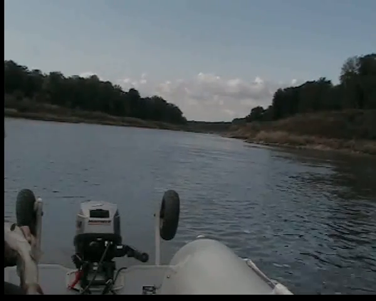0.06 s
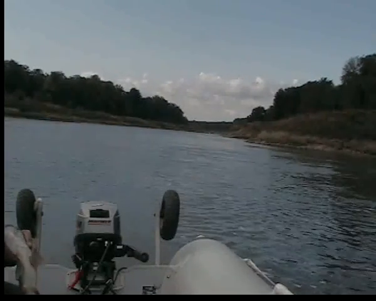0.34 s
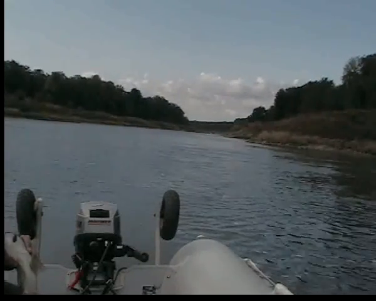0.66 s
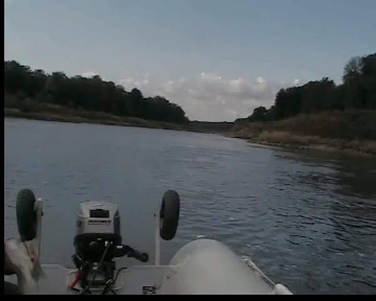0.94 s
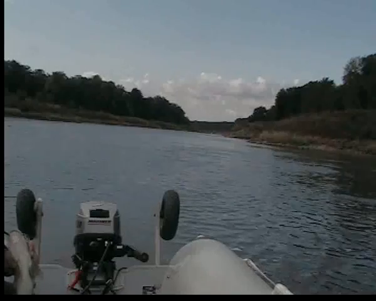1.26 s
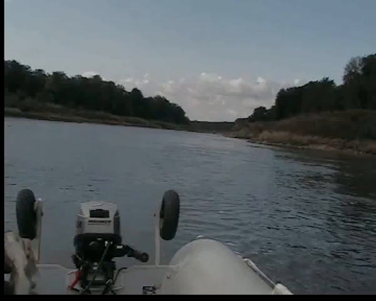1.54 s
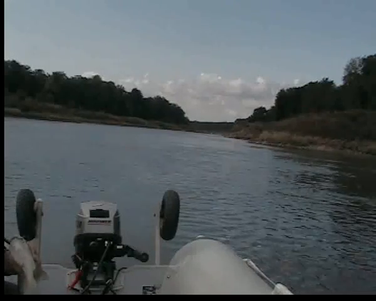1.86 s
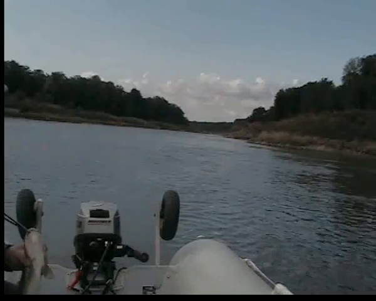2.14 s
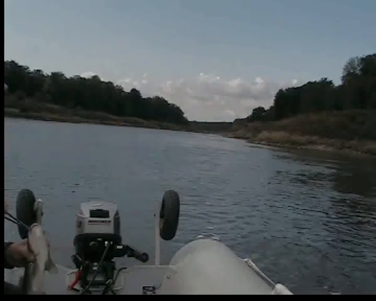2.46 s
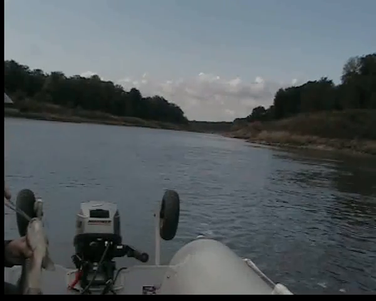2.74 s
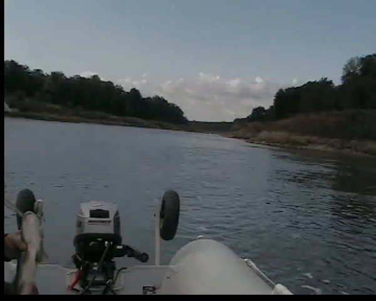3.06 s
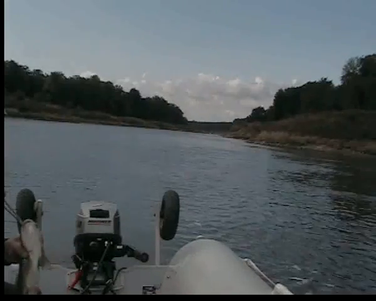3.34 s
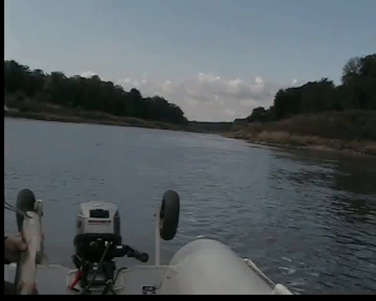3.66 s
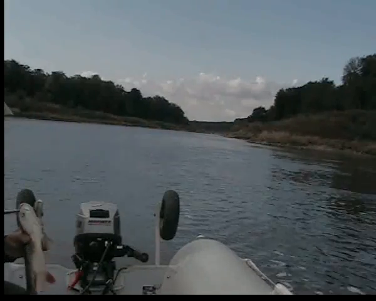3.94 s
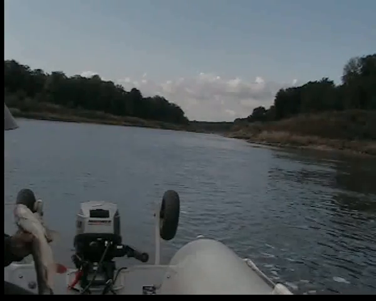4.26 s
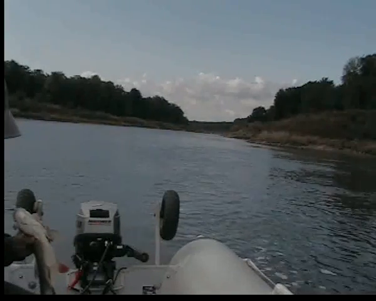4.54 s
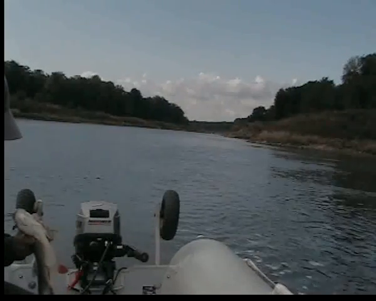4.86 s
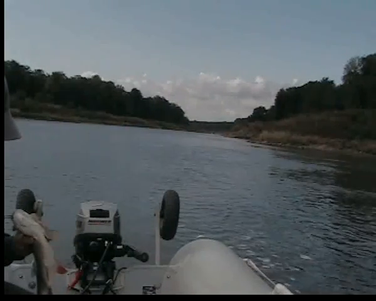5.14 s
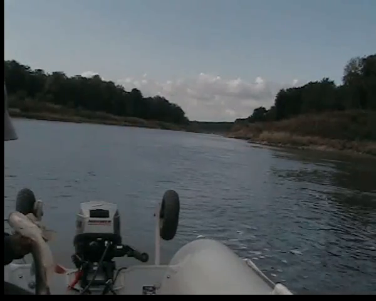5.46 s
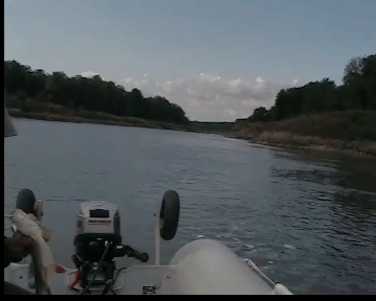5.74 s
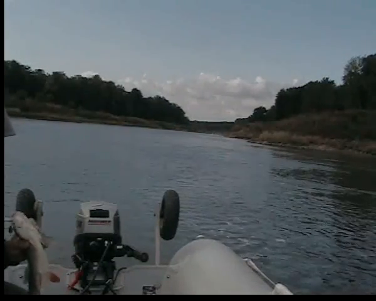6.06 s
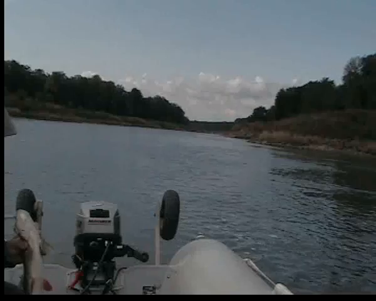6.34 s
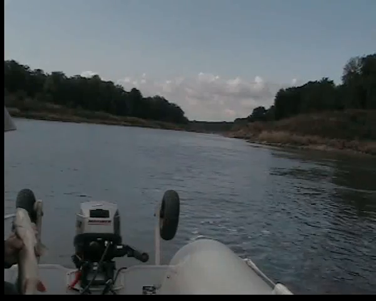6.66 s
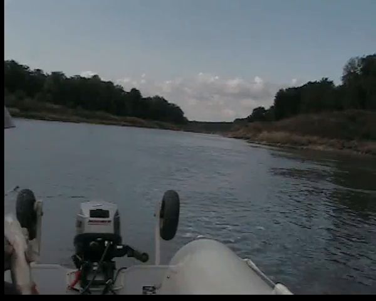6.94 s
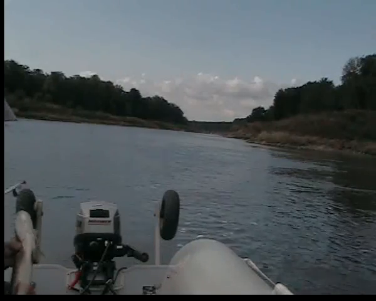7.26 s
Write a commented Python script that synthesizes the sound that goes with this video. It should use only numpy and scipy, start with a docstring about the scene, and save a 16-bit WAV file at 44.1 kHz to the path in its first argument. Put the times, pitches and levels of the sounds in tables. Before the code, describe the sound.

A metal lure and hooks jingle and clack in an inflatable boat, over low bumps, gentle wind rumble and hiss.

```python
"""Unhooking a fish in an inflatable boat

The boat drifts on a calm river while an angler works a metal lure free of a fish. Blade, rings and
hooks clink and jingle, hard tackle clacks, and the hull takes soft bumps and laps of water.
A light breeze rumbles on the microphone of a small camera that hisses and whines faintly.
A low hum wavers underneath, and a far bird chirps once."""
import sys
import numpy as np
from scipy.fft import rfft, irfft, next_fast_len
from scipy.io import wavfile
from scipy.ndimage import uniform_filter1d, map_coordinates

SR = 44100
rng = np.random.default_rng(int(sys.argv[2]) if len(sys.argv) > 2 else 0)


def wav_out(sig):
    """Save sig, one row per channel (or a flat mono array), as 16-bit PCM at SR to the path in sys.argv[1]."""
    wavfile.write(sys.argv[1], SR, np.round(np.clip(np.atleast_2d(sig).T, -1, 1) * 32767).astype(np.int16))


N = 321930
TIME = np.arange(N) / SR

# Table levels are relative: the layers apply their own trims.
# Gusts on the microphone. Each row: start in seconds, length in seconds, level in dB.
WIND_GUSTS = [(1.12, 0.39, -47), (2.33, 0.15, -46), (3.46, 0.12, -43.5), (3.83, 0.37, -46),
              (4.37, 0.34, -42), (4.88, 0.41, -47), (6.02, 0.55, -46), (6.88, 0.46, -43),
              (7.23, 0.13, -25.5)]
# The wind's rumble. Each row: frequency in Hz, noise density in dB.
WIND_SPECTRUM = [(8, -5.5), (22, 6), (45, -5), (70, -7), (120, -19), (250, -42.5), (600, -55), (2000, -120)]
# The drift of the low hum. Each row: time in seconds, pitch in Hz, level in dB.
HUM_PATH = [(0, 184.4, -67.5), (1.699, 185.8, -64.5), (2.2, 200.3, -70), (7.3, 203.4, -68.5)]
# The camera's hiss. Each row: frequency in Hz, noise density in dB.
HISS_SPECTRUM = [(30, -7.5), (100, -1.5), (140, -4), (200, -9), (270, -9.5), (450, -13), (900, -17),
                 (2000, -19.5), (3500, -19), (6200, -27.5), (10000, -29), (14500, -29), (15700, -33),
                 (16200, -56)]
# The camera's electrical hum and whine. Each row: frequency in Hz, level in dB.
CAMERA_TONES = [(100, -64.5), (14174, -80), (14223, -78), (15624, -76)]
# Water lapping at the hull. Each row: start in seconds, level in dB, starting pitch in Hz.
WATER_LAPS = [(0.097, -52, 406), (1.958, -49.5, 576), (2.683, -58, 312), (3.644, -52, 447),
              (3.962, -53.5, 638), (5.14, -50.5, 437), (6.329, -48, 521)]
# The wash around each lap. Each row: frequency in Hz, noise density in dB.
WASH_SPECTRUM = [(100, -25), (350, -7.5), (650, -8), (1200, -18.5), (4000, -30), (12000, -120)]
# Tackle knocking together. Each row: start in seconds, level in dB, favoured Hz, spread in octaves.
TACKLE_KNOCKS = [(0.151, -48, 2600, 0.12), (0.467, -48, 1500, 1.2), (0.821, -43, 1400, 0.21),
                 (1.163, -47.5, 1380, 0.9), (1.567, -45.5, 2040, 0.8), (1.747, -46, 1610, 0.58),
                 (1.892, -43.5, 1290, 1.1), (1.911, -43.5, 1050, 0.65), (1.939, -37.5, 1270, 0.09),
                 (3.256, -43.5, 2480, 1.3), (3.3997, -31, 1690, 1.1), (3.427, -29, 2600, 0.22),
                 (3.481, -40, 3330, 0.7), (3.951, -43, 2270, 1.1), (3.971, -46, 1840, 0.13),
                 (4.031, -48, 3000, 0.6), (4.058, -47, 3300, 0.5), (4.162, -47.5, 3380, 0.63),
                 (4.904, -50, 1750, 0.25), (6.098, -46.5, 6200, 0.2), (6.235, -38.5, 6200, 0.11),
                 (6.8645, -28, 1730, 0.21), (6.876, -36.5, 1270, 0.14)]
# The tackle's resonances. Each row: frequency in Hz, bandwidth in Hz, level in dB.
TACKLE_MODES = [(960, 290, 6), (1270, 116, 7), (1510, 240, 3.5), (1740, 560, 3.5), (2140, 240, 5.5),
                (2400, 134, 8.5), (3400, 190, 4.5), (3680, 130, 4.5), (6200, 760, -13)]
# Bouts of shaking the lure. Each row: start in seconds, length in seconds, level in dB.
LURE_SHAKES = [(0.2, 0.85, -62), (1.17, 0.14, -50), (1.57, 0.5, -52), (3.1, 0.41, -55), (3.96, 0.14, -45),
               (4.27, 0.32, -64), (6.89, 0.36, -48.5)]
# The blade's ring. Each row: frequency in Hz, level in dB.
BLADE_MODES = [(13550, -11), (13700, -2.5), (13900, -22)]
# The ring of hooks and split rings. Each row: frequency in Hz, level in dB.
HOOK_MODES = [(5800, -25), (5950, -24), (6150, -29), (6330, -26), (12460, -12), (12600, -18), (12920, -10),
              (13060, -1.5), (13150, -22), (13297, -19), (13390, -14)]
# The click of metal on metal. Each row: frequency in Hz, noise density in dB.
CLICK_SPECTRUM = [(1000, -23), (3500, -12.5), (5200, -13.5), (6000, -11), (8000, -2), (11000, 2),
                  (14500, 3.5), (15500, -4), (17000, -43)]
# Strikes on the lure. Each row: start in seconds, then blade, hook and click levels in dB.
LURE_STRIKES = [(0.5483, -51, -53, -61), (0.776, -46, -46, -62), (1.23, -46, -35.5, -60),
                (1.255, -50, -44, -45.5), (1.5804, -43, -42, -50), (1.6, -35, -38, -51),
                (1.74, -42, -43, -60), (1.772, -45, -39, -65), (1.8914, -36, -43, -36.5),
                (1.9384, -42, -45, -43), (1.988, -52, -37, -62), (2.0116, -35, -28, -61),
                (2.132, -37, -45, -51), (2.2782, -56, -46, -57), (2.453, -57, -53, -57),
                (3.138, -54, -40, -65), (3.2597, -48, -36, -53), (3.3995, -24, -50, -26.5),
                (3.4263, -39, -44, -29), (3.436, -23, -29, -26), (3.4475, -12, -16, -32),
                (3.4686, -9, -16, -29), (3.482, -14, -17, -28), (3.5705, -45, -24, -35),
                (3.578, -39, -35, -41), (3.7864, -47, -30.5, -49), (3.833, -56, -41, -48),
                (3.849, -38, -35, -49), (3.9492, -48, -48, -38), (4.0173, -48, -31, -37),
                (4.028, -46, -28, -40), (4.059, -45, -26, -40), (4.0684, -34, -25.5, -56),
                (4.137, -36, -33, -60), (4.1628, -34, -20, -36.5), (4.166, -24, -36, -43),
                (4.233, -41, -52, -68), (6.2668, -41, -40, -64), (6.2937, -41, -46, -59),
                (6.8306, -48, -46, -61), (6.866, -40, -35, -39), (6.881, -31, -20, -42),
                (6.887, -28, -25, -27.5), (6.901, -20, -25, -33), (6.9186, -10, -24, -42),
                (6.983, -41, -34, -49), (7.023, -23, -28, -45.5), (7.075, -42, -41, -56),
                (7.166, -37, -36.5, -67)]
# Light taps of line and hook. Each row: start in seconds, level in dB.
LINE_TAPS = [(1.0854, -47), (1.4036, -43), (1.6761, -43), (2.0976, -42), (2.6391, -45), (3.0615, -34),
             (3.088, -32), (3.9834, -46), (4.101, -38), (4.1264, -38), (5.5138, -47), (5.9135, -40),
             (6.097, -47), (6.2351, -27), (6.955, -44)]
# Soft bumps on the hull. Each row: start in seconds, level in dB, pitch in Hz.
HULL_BUMPS = [(1.966, -31, 139), (1.99, -35.5, 94), (4.526, -30, 40), (4.624, -31, 26.8),
              (5.247, -28.5, 51.6), (6.305, -27, 62), (6.342, -29, 31.3), (6.514, -37.5, 43.8),
              (6.883, -32, 97), (7.193, -25.5, 27), (7.25, -14.5, 51)]

# A light touch rings freely; a hard one presses the parts together and rings shorter.
RING_T60_S, LIGHT_DB, HALVING_DB = 0.09, -43, 41
GLANCE_RISE_S, STRIKE_RISE_S = 0.002, 0.00042


def amp(db):
    """Decibels to gain."""
    return 10 ** (np.asarray(db) / 20)


def unit(x):
    """Scale to rms 1."""
    return x / np.sqrt(np.mean(x ** 2) + 1e-20)


def wobble(rate):
    """A smooth random curve, rate knots a second."""
    return map_coordinates(rng.standard_normal(int(N * rate / SR) + 4), [TIME * rate])


def filtered(x, response):
    """Shape x with a frequency response."""
    size = next_fast_len(len(x) + 8192)
    return irfft(rfft(x, size) * response(np.fft.rfftfreq(size, 1 / SR)), size)[:len(x)]


def curve_db(spectrum, f):
    """Read an EQ curve of (Hz, dB) points on a log frequency axis."""
    hz, db = np.transpose(spectrum)
    return np.interp(np.log(f + 1), np.log(hz), db)


def noise(spectrum):
    """Noise of rms 1 coloured by an EQ curve."""
    return unit(filtered(rng.standard_normal(N), lambda f: amp(curve_db(spectrum, f))))


def add(track, s, sound):
    """Mix a sound into the track at s seconds."""
    part = track[max(round(s * SR), 0):][:len(sound)]
    part += sound[:len(part)]


def swells(rows, attack_s, release_s, rest_db):
    """An envelope whose swells rise, hold and die away above a resting level."""
    power = amp(rest_db) ** 2
    for s, length, db in rows:
        fade = np.maximum(s - TIME, 0) / attack_s + np.maximum(TIME - s - length, 0) / release_s
        power = power + (amp(db) * np.exp(-fade)) ** 2
    return np.sqrt(power)


def breeze(level_db=-1, lumps_db=2):
    """Slow eddies push on the microphone; light air keeps moving between gusts."""
    strength = swells(WIND_GUSTS, attack_s=0.034, release_s=0.055, rest_db=-54.5)
    rumble = unit(noise(WIND_SPECTRUM) * amp(lumps_db * wobble(15)))
    return amp(level_db) * strength * rumble


def low_hum(waver_hz=7, flutter_db=2):
    """A faint low hum wavers in pitch and strength."""
    s, hz, db = np.transpose(HUM_PATH)
    pitch = np.interp(TIME, s, hz) + waver_hz * wobble(30)
    level = amp(np.interp(TIME, s, db) + flutter_db * wobble(14))
    return level * np.sqrt(2) * np.sin(2 * np.pi * np.cumsum(pitch) / SR)


def camera_noise(hiss_db=-57, waver_rad=1.0):
    """A bed of steady hiss with a few slightly unsteady electrical tones."""
    tones = sum(amp(db) * np.sqrt(2) * np.sin(2 * np.pi * hz * TIME + waver_rad * wobble(20))
                for hz, db in CAMERA_TONES)
    return amp(hiss_db) * noise(HISS_SPECTRUM) + tones


def water_laps(level_db=1, t60=0.076, glide=3, splash=0.77):
    """Small pockets of air plop under the hull, rising in pitch inside a soft wash."""
    plops, wash = np.zeros(N), np.zeros(N)
    t = np.arange(SR // 8) / SR
    for s, db, hz in WATER_LAPS:
        envelope = amp(db + level_db - 60 * t / t60) * (1 - np.exp(-t / 0.0005))
        add(plops, s, envelope * np.sin(2 * np.pi * hz * t * (1 + glide * t)))
        add(wash, s, splash * envelope)
    return plops + wash * noise(WASH_SPECTRUM)


def tackle_body(f, favoured_hz, octaves):
    """The hard tackle's response: the point of contact favours some of its modes."""
    response = 0
    for k, (hz, width, db) in enumerate(TACKLE_MODES):
        favour = 1 / (1 + (np.log2(hz / favoured_hz) / octaves) ** 2)
        resonance = hz * width / (hz * hz - f * f + 1j * f * width)
        response += (-1) ** k * favour * amp(db) * resonance
    return response * 1j * f / (500 + 1j * f)  # low cut at 500 Hz


def tackle_clacks(level_db=-6, scrape=0.047, scrape_t60=0.056):
    """A blow and a short scrape excite the tackle's body."""
    track = np.zeros(N)
    t = np.arange(SR // 10) / SR
    for s, db, favoured_hz, octaves in TACKLE_KNOCKS:
        force = (t == 0) + scrape * rng.standard_normal(len(t)) * amp(-60 * t / scrape_t60)
        clack = filtered(force, lambda f: tackle_body(f, favoured_hz, octaves))
        clack *= np.sqrt(0.003 * SR) / np.linalg.norm(clack)  # the energy of 3 ms at rms 1
        add(track, s, amp(db + level_db) * clack)
    return track


def metal_ring(modes, t, scatter_db, wander):
    """Modes ring at fresh strengths and phases, together as strong as one unit sine."""
    hz, db = np.transpose(modes)
    gain = amp(db + scatter_db * rng.standard_normal(len(hz)))
    phase = rng.uniform(0, 2 * np.pi, (len(hz), 1))
    # loose parts brush each other as they ring, so every mode's phase drifts
    drift = wander * np.cumsum(rng.standard_normal((len(hz), len(t))), axis=1) / np.sqrt(SR)
    return gain / np.linalg.norm(gain) @ np.sin(2 * np.pi * hz[:, None] * t + phase + drift)


def lure_ring(t, blade_gain, hooks_gain):
    """The bright blade and the cluster of hooks ring together."""
    blade = metal_ring(BLADE_MODES, t, scatter_db=2, wander=3)
    hooks = metal_ring(HOOK_MODES, t, scatter_db=3.5, wander=7)
    return blade_gain * blade + hooks_gain * hooks


def lure_jingle(per_second=45, level_db=2, spread_db=4, hooks_db=-8,
                tick_db=-14, tick_t60=0.032, t60=0.063, rise_s=0.0032):
    """Loose rings and hooks keep touching: lively when shaken, barely heard when the lure dangles."""
    metal, contact = np.zeros(N), np.zeros(N)
    t = np.arange(SR // 12) / SR
    envelope = amp(-60 * t / t60) * (1 - np.exp(-t / rise_s))
    shake = swells(LURE_SHAKES, attack_s=0.02, release_s=0.031, rest_db=-76)
    for s in np.sort(rng.uniform(0, N / SR, int(per_second * N / SR))):
        strength = shake[int(s * SR)] * amp(level_db + spread_db * np.clip(rng.normal(), -2, 1.5))
        add(metal, s, strength * envelope * lure_ring(t, 1, amp(hooks_db)))
        add(contact, s, strength * amp(tick_db - 60 * t / tick_t60))
    return metal + contact * noise(CLICK_SPECTRUM)


def bird_chirp(level_db=-62, start_s=0.545, length_s=0.085):
    """A far bird gives one faint rising note."""
    progress = np.clip((TIME - start_s) / length_s, 0, 1)
    pitch = 2700 + 800 * progress
    envelope = amp(level_db + 1.6 * wobble(86)) * np.sin(np.pi * progress)
    return envelope * np.sin(2 * np.pi * np.cumsum(pitch) / SR)


def contact_click(force, colour_db=4.5):
    """Bright noise follows a contact force; each point of contact has its own uneven colour."""
    ripple_db = colour_db * rng.standard_normal(SR // 900)
    ripple_hz = np.linspace(0, SR / 2, len(ripple_db))
    colour = lambda f: amp(curve_db(CLICK_SPECTRUM, f) + np.interp(f, ripple_hz, ripple_db))
    burst = force * filtered(rng.standard_normal(len(force)), colour)
    return burst * np.linalg.norm(force) / np.linalg.norm(burst)


def lure_clinks(hooks_trim_db=-4, click_t60=0.015, chatter_db=-14, chatter_t60=0.11,
                choke_t60=0.015, slide_db=-17, slide_t60=0.023):
    """Each contact slides in, clicks, chatters and rings the lure until the next contact damps it."""
    track = np.zeros(N)
    t = np.arange(SR // 5) / SR
    gaps = np.diff([row[0] for row in LURE_STRIKES], append=N / SR)
    for (s, blade_db, hooks_db, click_db), gap in zip(LURE_STRIKES, gaps):
        ring_db = max(blade_db, hooks_db)
        t60 = RING_T60_S * 2 ** ((LIGHT_DB - ring_db) / HALVING_DB)
        # a glancing touch with little click builds its ring slowly
        rise_s = np.interp(click_db - ring_db, [-20, -5], [GLANCE_RISE_S, STRIKE_RISE_S])
        choke = amp(-60 * np.maximum(t - gap, 0) / choke_t60)
        envelope = amp(-60 * t / t60) * (1 - np.exp(-t / rise_s)) * choke
        hooks_gain = amp(hooks_db + hooks_trim_db)
        add(track, s, envelope * lure_ring(t, amp(blade_db), hooks_gain))
        # after the first click the parts bounce unevenly against each other
        roughness = unit(uniform_filter1d(rng.standard_normal(len(t)), size=60))
        bounces = unit(amp(10.4 * roughness))
        force = amp(-60 * t / click_t60) + bounces * amp(chatter_db - 60 * t / chatter_t60)
        add(track, s, amp(click_db) * contact_click(force))
        # the hooks slide along their rings just before they strike
        slide = hooks_gain * amp(slide_db - 60 * t[::-1] / slide_t60)
        add(track, s - t[-1], contact_click(slide))
    return track


def line_taps(level_db=-8, t60=0.032):
    """Line and hook give dry little taps that leave no ring."""
    track = np.zeros(N)
    t = np.arange(SR // 10) / SR
    for s, db in LINE_TAPS:
        add(track, s, contact_click(amp(db + level_db - 60 * t / t60)))
    return track


def hull_bumps(level_db=5, t60_cycles=4.5, attack_s=0.007):
    """The air-filled hull gives for a cycle or two and settles."""
    track = np.zeros(N)
    t = np.arange(SR // 4) / SR
    for s, db, hz in HULL_BUMPS:
        envelope = amp(db + level_db - 60 * t * hz / t60_cycles) * (1 - np.exp(-t / attack_s))
        add(track, s, envelope * np.sin(2 * np.pi * hz * t))
    return track


def scene():
    """Tackle up front, boat and air beneath, mixed to mono."""
    tackle = lure_clinks() + line_taps() + lure_jingle() + tackle_clacks()
    boat = water_laps() + hull_bumps()
    ambience = breeze() + bird_chirp() + low_hum() + camera_noise()
    return (tackle + boat + ambience)[None]


def record(dry):
    """The camera's band limit cuts the top end steeply."""
    top_hz = 16200
    high_cut = lambda hz: 1 / np.sqrt(1 + (hz / top_hz) ** 160)
    return np.array([filtered(channel, high_cut) for channel in dry])


dry = scene()
out = record(dry)
wav_out(out)
```